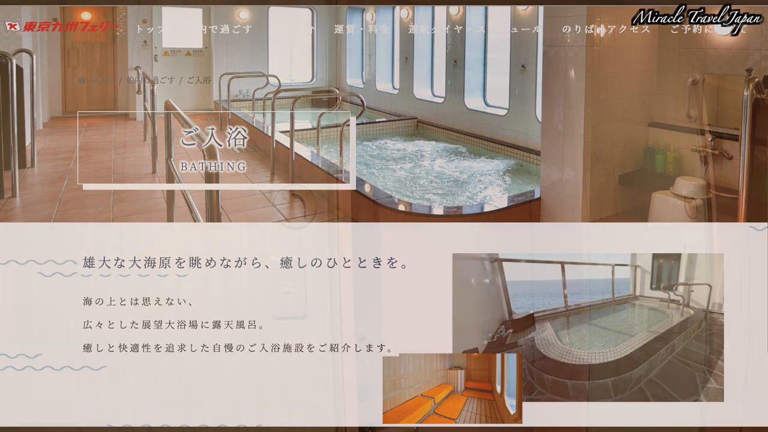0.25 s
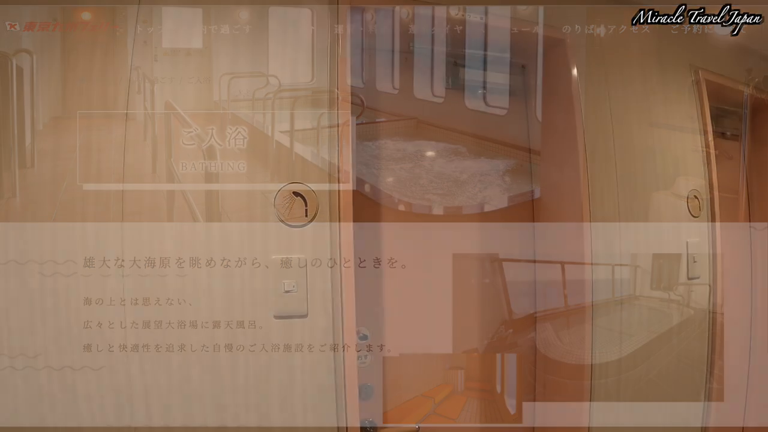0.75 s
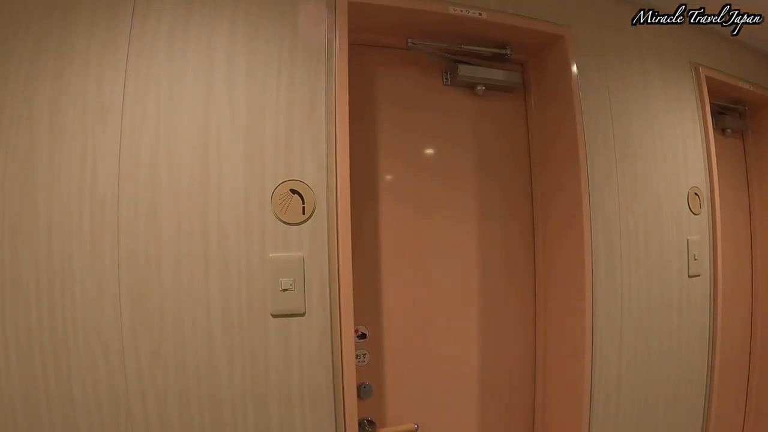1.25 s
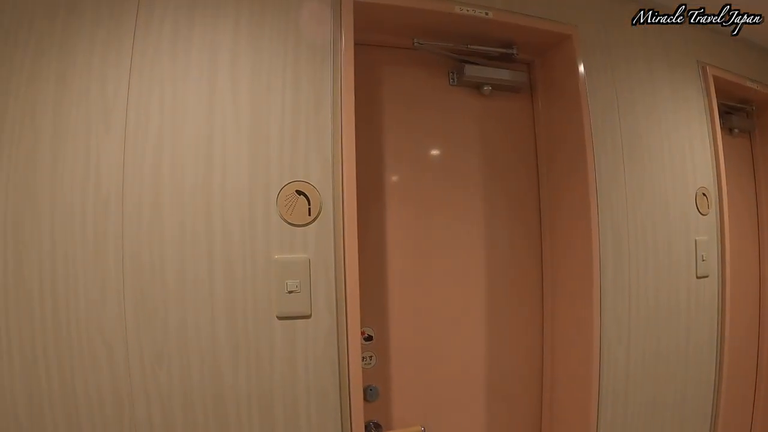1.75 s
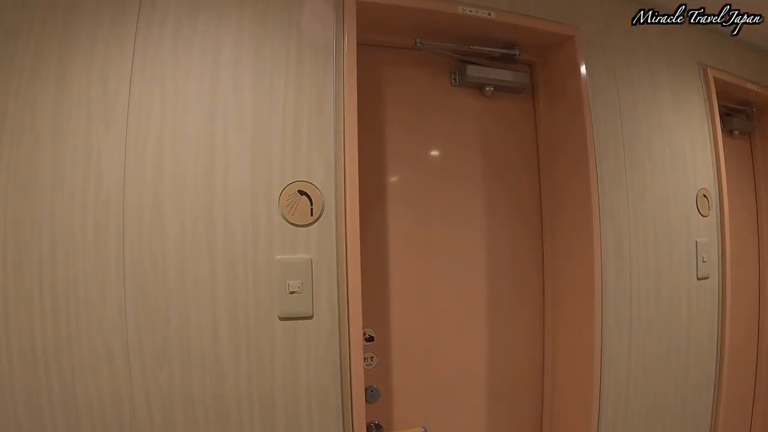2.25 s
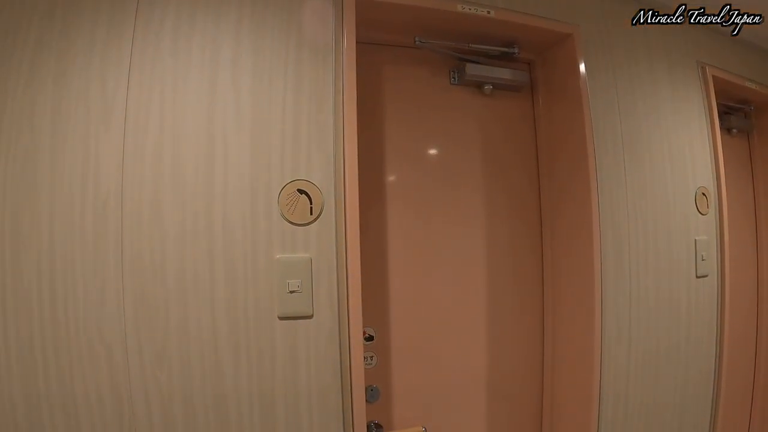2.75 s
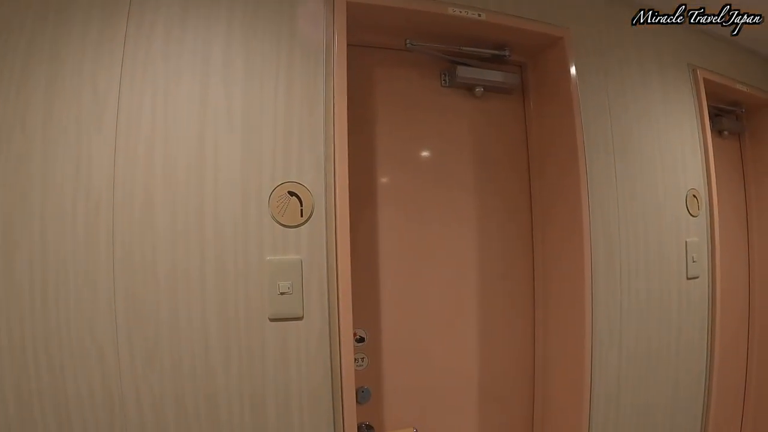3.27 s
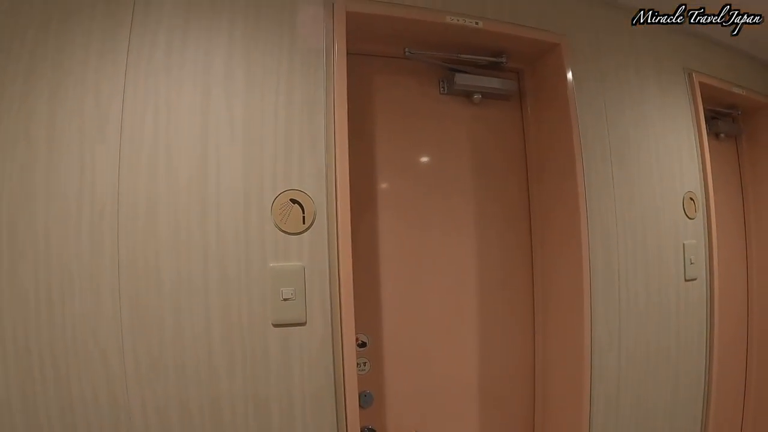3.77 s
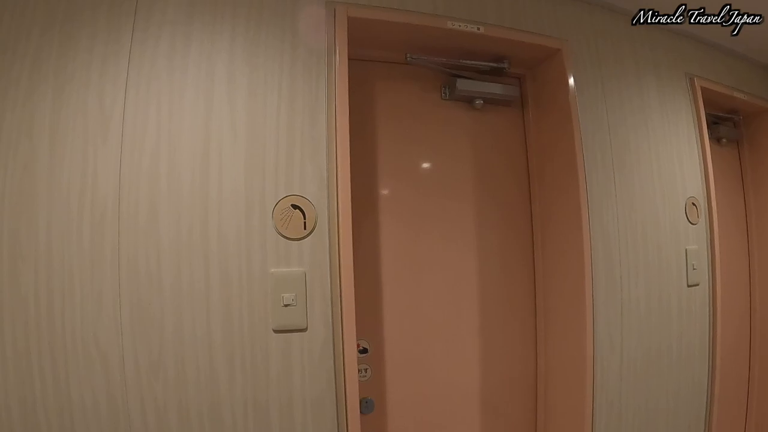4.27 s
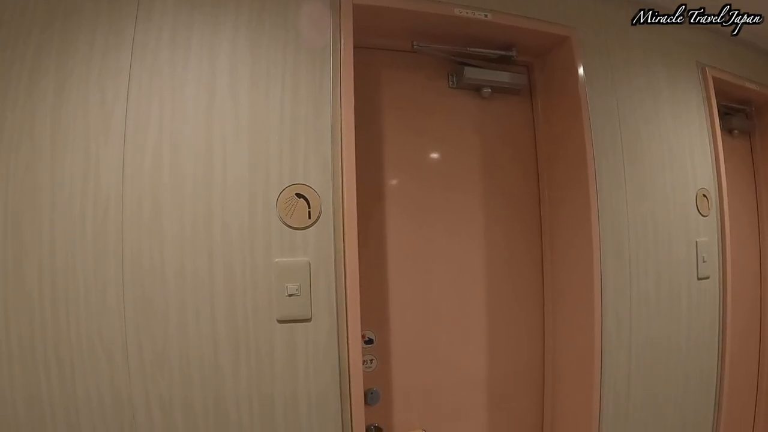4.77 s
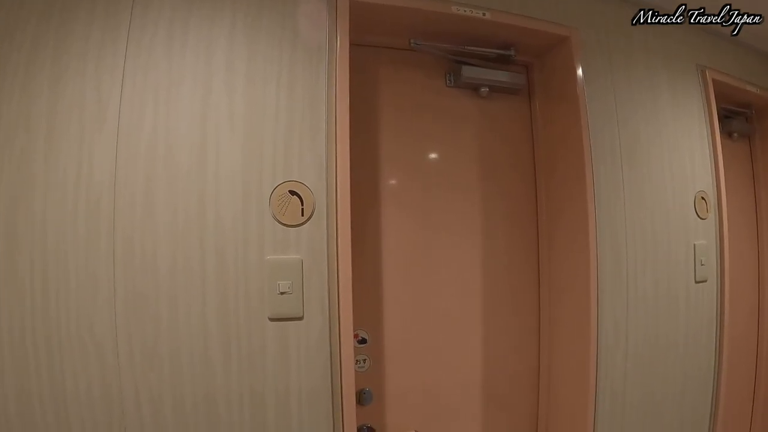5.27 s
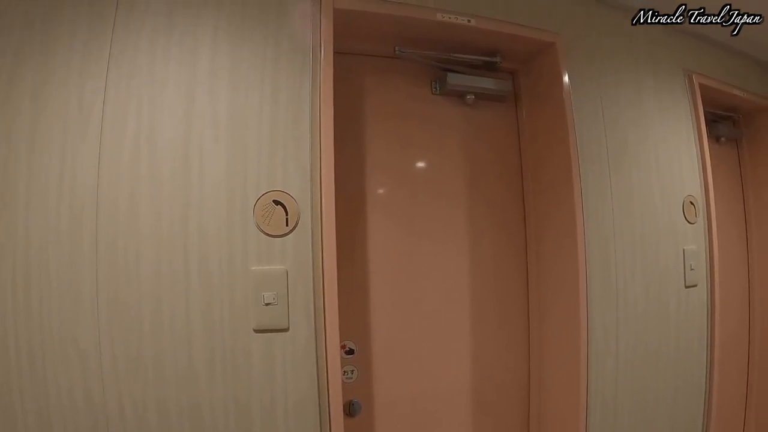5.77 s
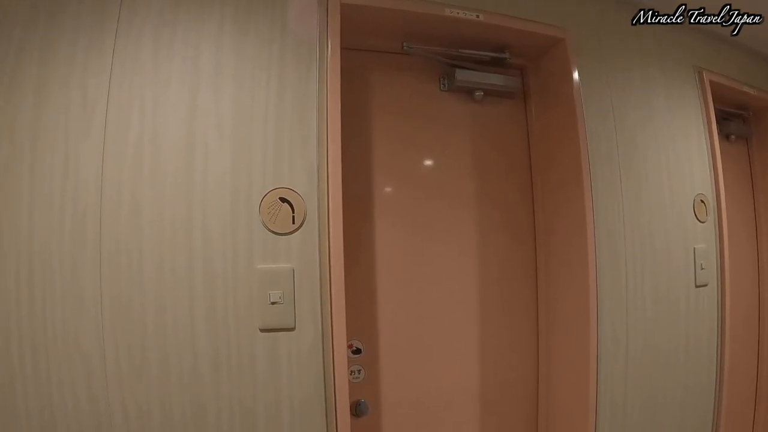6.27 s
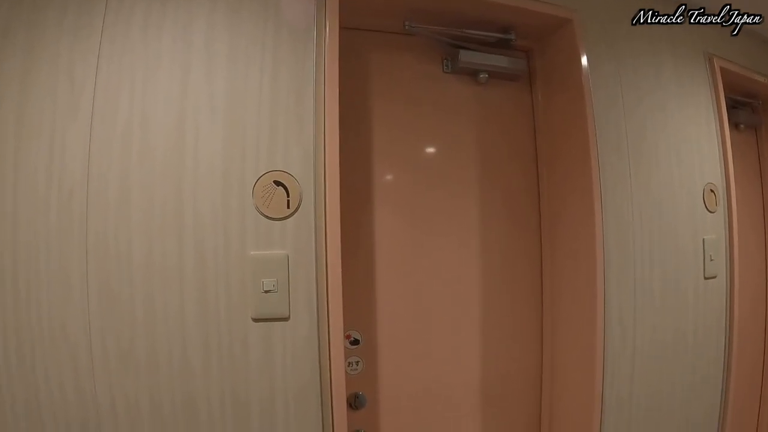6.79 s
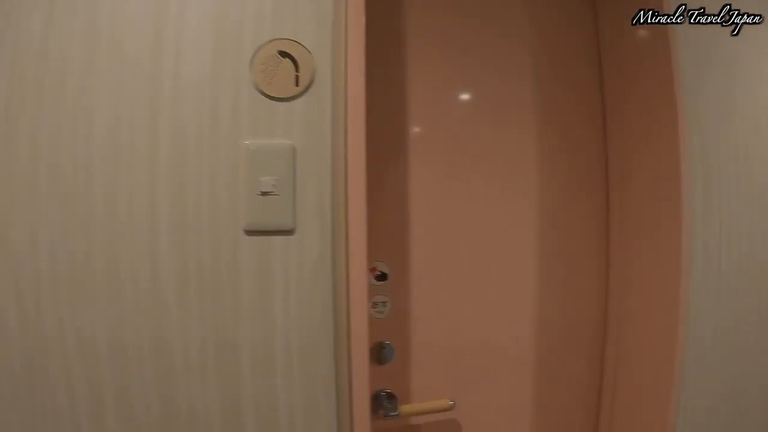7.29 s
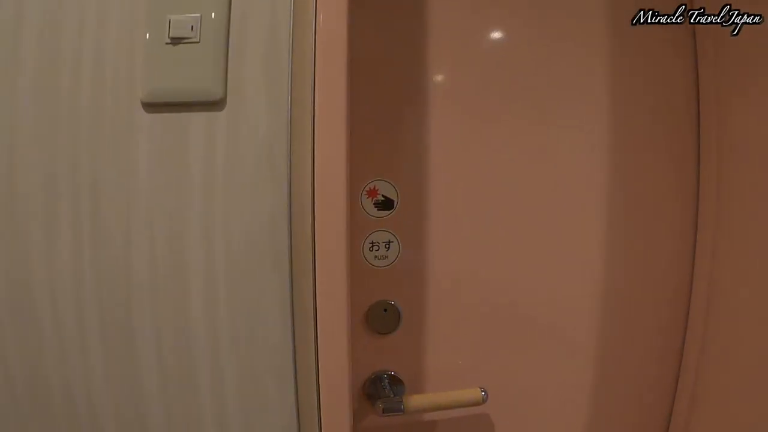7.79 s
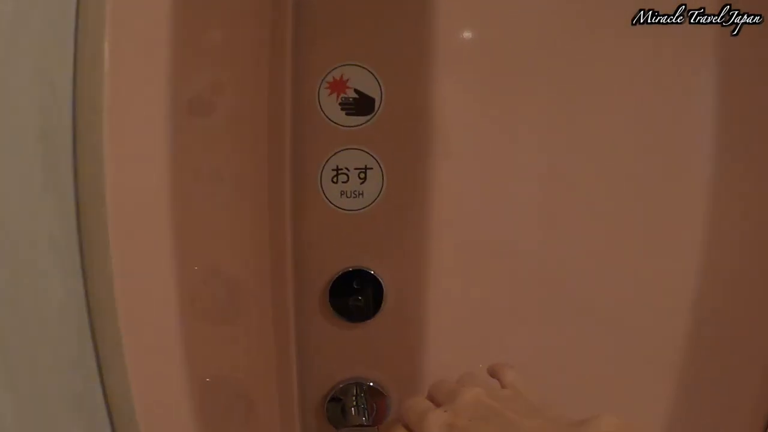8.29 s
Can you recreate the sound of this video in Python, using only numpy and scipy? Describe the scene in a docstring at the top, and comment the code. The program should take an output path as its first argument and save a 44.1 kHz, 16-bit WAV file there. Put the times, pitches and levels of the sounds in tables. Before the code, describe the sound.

Handheld microphone in a shower room aboard a ship: beating, wavering engine rumble beneath a dull broad roar and steady fan tones, all fading in quickly. Reverberant clunks come from somewhere down the room in the first few seconds, then scattered light ticks. After a stretch of just rumble and hum, cloth rubs softly and a close door handle gives crisp clicks and small rattles. Treble is muffled.

```python
"""Shower room on a ship

Engines throb through the hull, made of close tones that beat and low booms of wandering pitch.
Machinery and ventilation roar and hum behind the walls: shaped noise and steady tones, which fade in.
A faint treble dies away at the start. Hard things are knocked further down the tiled room (ringing noise
with echo); close by, small parts click (short bursts of noise) and clothes rustle (grainy hiss).
"""
import sys
import numpy as np
from scipy import signal
from scipy.fft import rfft, irfft, next_fast_len
from scipy.io import wavfile
from scipy.ndimage import uniform_filter1d

SR = 44100
rng = np.random.default_rng(int(sys.argv[2]) if len(sys.argv) > 2 else 0)


def output_pcm(signal):
    """Save a mono or channel-first signal as 16-bit PCM at the path in sys.argv[1].

    Samples are clipped to [-1, 1] before scaling.
    """
    pcm = np.clip(np.atleast_2d(signal).T, -1, 1) * 32767
    wavfile.write(sys.argv[1], SR, np.round(pcm).astype(np.int16))


N = 376613


def undb(db):
    """Turn decibels into a gain."""
    return 10 ** (np.asarray(db) / 20)


def level(x, db):
    """Scale a sound to an average (rms) level."""
    return x * undb(db) / np.sqrt(np.mean(x ** 2))


def curve(table, column=1):
    """Join the points of a table column by straight lines in time."""
    rows = np.array(table)
    return np.interp(np.arange(N) / SR, rows[:, 0], rows[:, column])


def over(table, hz):
    """Join the points of a (pitch_hz, value) table on a logarithmic pitch axis."""
    rows = np.array(table)
    return np.interp(np.log(hz), np.log(rows[:, 0]), rows[:, 1])


def freqs(size):
    """Frequencies of a transform's bins, in Hz, kept off zero."""
    return np.maximum(np.fft.rfftfreq(size, 1 / SR), 1)


def rings(modes, hz):
    """Add up the power of resonances (pitch_hz, width_hz, level_db)."""
    return sum(undb(2 * db) / (1 + (2 * (hz - f) / width) ** 2) for f, width, db in modes)


# How wide the stereo noise is: (pitch_hz, side_minus_mid_db)
WIDTH = [(30, -23), (60, -29.5), (125, -23.5), (190, -18.5), (300, -16), (600, -6), (1000, -4), (2000, -3),
         (4000, -1.5), (8000, -1), (13000, 1.5)]
# How sound leans to one side: (pitch_hz, left_minus_right_db)
LEAN = [(30, .2), (125, .3), (250, .9), (500, 1.8), (1000, 2.3), (2000, 1.9), (4500, 1.1), (8000, 2.1),
        (13000, 0)]
# How far the right port leads the left: (pitch_hz, phase_radians)
LAG = [(125, .03), (250, .09), (500, 0.25), (1200, 0.27), (2800, 0.86), (6000, .05)]


def pair(size, gain):
    """Coloured noise on two ports: much alike in the bass, less so in the treble."""
    hz = freqs(size)
    mid, side = rfft(rng.standard_normal((2, size))) * gain
    side = side * undb(over(WIDTH, hz))
    # each port takes half of the lean and half of the lag
    lean = undb(over(LEAN, hz) / 2) * np.exp(-.5j * over(LAG, hz))
    return irfft(np.array([(mid + side) * lean, (mid - side) / lean]), size)


def walk(rate):
    """Slow random wander: values drawn `rate` times a second, smoothed twice."""
    hold = int(SR / rate)
    steps = np.repeat(rng.standard_normal(N // hold + 1), hold)
    return uniform_filter1d(uniform_filter1d(steps, hold), hold)[:N]


def swells(table):
    """Gain of bell-shaped swells (peak_s, level_db, length_s), added as power."""
    t = np.arange(N) / SR
    return np.sqrt(sum(undb(2 * db) * np.exp(-(2 * (t - s) / length) ** 2) for s, db, length in table))


def pan(x, db):
    """Put a sound on both ports, the left louder by db."""
    return x * undb(np.array([[db], [-db]]) / 2)


def add(out, x, s):
    """Mix x in at time s, in seconds."""
    i = int(s * SR)
    out[:, i:i + x.shape[1]] += x[:, :N - i]


# Machines that shake the hull: (turns_per_s, stroke_s,
# {multiple of the turning rate: push 1 or pull -1})
ENGINES = [(5.6205, .0286, {5: -1, 6: 1, 7: 1}), (6.007, .1217, {5: 1, 6: 1}), (27.533, .014, {1: 1})]
# How strongly the deck answers an engine tone: (pitch_hz, level_db)
SHAKE = [(27.5, -35), (28.1, -36), (30, -34), (33.7, -30.5), (36, -34), (39.3, -39)]
# Deepest hull booms: (middle_pitch_hz, wander_scale_hz, relative_level_db)
HULL = [(25.5, 2.2, -3), (34.8, 1.2, 0), (41, 1.6, -7)]
HULL_DB, HULL_WANDER_PER_S = -33, 2.5  # level before the throb's own rises and dips
# Rises and dips of the whole throb: (time_s, change_db)
THROB = [(0, 2.5), (.6, -0.5), (1, -1.5), (1.4, 3), (1.7, 4), (1.95, -13), (2.1, 0.5), (2.5, -1.5),
         (2.75, 4), (3.25, -3), (3.4, -13.5), (3.6, 2), (3.8, -0.5), (4.05, 9), (4.3, -18), (4.6, 2),
         (5, -1), (5.25, -1), (5.5, 7), (5.88, -3.5), (6.25, 5), (6.5, -0.5), (6.73, -8), (6.92, 5.5),
         (7.16, -9), (7.4, -2.5), (7.7, -7), (7.97, -2), (8.2, -12), (8.54, 4.5)]
THROB_LEAN_DB = .3  # left minus right


def throb():
    """Close engine tones beat against each other, and the hull booms at a wandering pitch."""
    t = np.arange(N) / SR
    beats = 0
    for rate, stroke, multiples in ENGINES:
        for multiple, push in multiples.items():
            tone_hz = multiple * rate
            amplitude = push * np.sqrt(2) * undb(over(SHAKE, tone_hz))
            beats = beats + amplitude * np.cos(2 * np.pi * tone_hz * (t - stroke))
    boom = 0
    for middle_hz, wander_hz, db in HULL:
        pitch_hz = middle_hz + wander_hz * walk(HULL_WANDER_PER_S)
        boom = boom + undb(db) * np.sin(2 * np.pi * np.cumsum(pitch_hz) / SR)
    return pan((beats + level(boom, HULL_DB)) * undb(curve(THROB)), THROB_LEAN_DB)


# Swells of the pump tone: (peak_s, level_db, length_s)
PUMP = [(1.7, -61, 0.2), (3.4, -62, 0.15), (4.58, -61, 0.081), (7.15, -52.5, 0.1), (7.8, -54, 0.34)]
PUMP_HZ, PUMP_IDLE_DB = 668, -64
TONE_LEAN_DB = 5  # left minus right


def pump():
    """A motor tone idles softly and swells now and then, its level and pitch wandering a little."""
    gain = (undb(PUMP_IDLE_DB) + swells(PUMP)) * undb(1.8 * walk(5.1))
    pitch_hz = PUMP_HZ + 1.81 * walk(4)
    return pan(np.sqrt(2) * gain * np.sin(2 * np.pi * np.cumsum(pitch_hz) / SR), TONE_LEAN_DB)


# Colour of the roar: (pitch_hz, relative_level_db_per_hz)
ROAR = [(6, -21.5), (14, -9), (22, -15), (33, -19.5), (44, -19.5), (52, -18.5), (110, -24), (160, -32.5),
        (215, -36.5), (400, -39.5), (800, -42.5), (1230, -45), (2500, -58), (8000, -73.5), (11000, -80),
        (15000, -97.5)]
# Walls and deck plates that the roar rings: (pitch_hz, width_hz, db_over_the_roar)
PLATES = [(64.2, 9.4, 8.5), (90.4, 12.3, 7.5), (138, 13, 5), (141.7, 6.8, 8.5), (181, 11.7, 9),
          (191.4, 7.4, 11), (238.3, 8.6, 7.5), (269.4, 21.6, 10.5), (287.6, 12, 9.5), (336, 14, 5.5),
          (359, 23.2, 8.5), (511.5, 3.3, 3.5), (758, 9.6, 2.5)]
# Level changes of three bands of the roar: (time_s, bass_db, low_middle_db, treble_db)
PLACE = [(0, 1.5, 3.5, -2), (1.2, 1, 6, -3.5), (2, 2, 1, -3), (2.8, -1.5, 3.5, -4), (4, 2, 2, -1.5),
         (5.2, 4, 1, -0.5), (6, 0, 1, -1.5), (7.2, 2.6, -0.3, 0.8), (8.54, 3, 2, -2)]
ROAR_DB = -30  # before those changes
DEEP_HZ, LOW_MIDDLE_HZ, TREBLE_HZ = 133, 450., 5500.  # edges between the bands


def roar():
    """Broad noise rings the walls and plates; its bass, low middle and treble rise and fall apart."""
    size = next_fast_len(N)
    hz = freqs(size)
    noise = level(pair(size, undb(over(ROAR, hz)) * np.sqrt(1 + rings(PLATES, hz))), ROAR_DB)
    spectrum = rfft(noise)
    # everything below each edge; differences between these are the bands
    deep, low, body = (irfft(spectrum / (1 + (hz / edge) ** 4), size)[:, :N]
                       for edge in (DEEP_HZ, LOW_MIDDLE_HZ, TREBLE_HZ))
    bass = deep * undb(curve(PLACE))
    low_middle = (low - deep) * undb(curve(PLACE, column=2))
    treble = (noise[:, :N] - body) * undb(curve(PLACE, column=3))
    return bass + low_middle + (body - low) + treble


# Steady tones of fans and motors: pitch_hz
HUM_HZ = [92.6, 135.4, 148.6, 232.1, 288.6, 302.9, 355, 361, 638.6, 671.4, 725.4, 729.5]
# One row for each of those tones: (level_halfway_db, drift_db_per_s)
HUM = [(-46, 0), (-53, 0), (-50, 0), (-60, 0), (-56, 0), (-61, 0), (-53, 0), (-57, 0), (-65, 0.2), (-67, 0),
       (-72, -.3), (-60, -.8)]
# Another motor, its first four multiples: level_db
MOTOR_DB = [-46.5, -55.5, -59.5, -56]
MOTOR_HZ = 64.27
WAVER_DB, WAVER_RAD = 1.5, .6  # scale of the random wander in level and phase


def hum():
    """Fan and motor tones, each wavering a little in level and phase."""
    t = np.arange(N) / SR
    tones = [(f, db + drift * (t - N / 2 / SR)) for f, (db, drift) in zip(HUM_HZ, HUM)]
    tones += [((k + 1) * MOTOR_HZ, db) for k, db in enumerate(MOTOR_DB)]
    out = 0
    for f, db in tones:
        gain = np.sqrt(2) * undb(db + WAVER_DB * walk(3.))
        tone = gain * np.sin(2 * np.pi * f * t + WAVER_RAD * walk(1.46))
        out = out + pan(tone, over(LEAN, f))
    return out


FADE_START_S, FADE_S, FADE_FLOOR_DB = 0.093, 0.63, -23.5
RISE_DB_PER_S = 0.27


def fade():
    """A straight fade-in from a soft floor, with a slow rise in level to the end."""
    t = np.arange(N) / SR
    fade_in = np.clip((t - FADE_START_S) / FADE_S, undb(FADE_FLOOR_DB), 1)
    return fade_in * undb(RISE_DB_PER_S * (t - t[-1]))


# Ringing bands of the faint first treble: (pitch_hz, width_hz, relative_level_db)
FIRST_HISS = [(2150, 180, 1), (2840, 200, 0), (3970, 250, 4), (5700, 270, -3), (7400, 540, 2),
              (9250, 600, 1), (12700, 2200, 4)]
FIRST_HISS_DB, FIRST_HISS_T60_S = -53, 0.43  # level before the decay; time to fall by 60 dB


def first_hiss():
    """A faint ringing treble, noise shaped by resonances, dies away from the start."""
    size, out = 2 ** 14, np.zeros((2, N))
    colour = np.sqrt(undb(-30) + rings(FIRST_HISS, freqs(size)))
    hiss = level(pair(size, colour), FIRST_HISS_DB)
    add(out, hiss * undb(-60 * np.arange(size) / SR / FIRST_HISS_T60_S), 0)
    return out


# How long the tiled room echoes: (pitch_hz, time_to_fall_60_db_s)
TILES = [(500, 1.2), (1500, 0.77), (4000, 0.72), (9000, 0.64), (15000, 0.13)]
TILES_HOLD_S = 0.052  # the decay starts gently over about this time


def tiles(size):
    """Echo of the room: dense at once, held while sound comes round the corner, then dying by band."""
    hz, s, out = freqs(size), np.arange(size) / SR, 0
    late = np.sqrt(s ** 2 + TILES_HOLD_S ** 2) - TILES_HOLD_S
    for centre in 350 * 2 ** np.arange(6):  # bands an octave apart
        band = np.cos(np.pi / 2 * np.clip(np.log2(hz / centre), -1, 1))
        out = out + pair(size, band) * undb(-60 * late / over(TILES, centre))
    return out


# The blows: (start_s, level_db, centre_hz, breadth_octaves, own_ring_hz, ring_db)
KNOCKS = [(0.817, -47, 2740, 1.75, 1630, 10.5), (0.828, -54.5, 2780, 0.92, 2860, 12),
          (1.078, -60.5, 3900, 0.67, 2960, 11), (1.38, -66, 5000, 0.91, 5000, -1),
          (1.934, -54, 2980, 1.1, 3000, 1), (1.94, -63.5, 9500, .5, 9500, 2),
          (1.97, -64, 4300, 0.57, 4300, 6), (2.04, -62, 4100, 0.58, 4100, 10),
          (2.422, -41, 1860, 1.5, 1410, 13.5), (2.45, -47, 2370, .3, 2380, 8),
          (2.501, -45, 1750, 0.27, 1730, 6), (2.685, -32.5, 2960, 1.2, 1840, 13),
          (2.696, -40.5, 2350, 1.5, 1500, 14), (2.74, -40, 2200, 1.4, 1800, -1),
          (2.765, -44.5, 1650, 0.47, 1560, 10), (2.70, -43, 556, 1.24, 550, 13.5),
          (3.649, -55.5, 5200, 0.76, 4900, 7), (3.66, -72, 6700, .4, 6800, 4),
          (3.688, -55, 4000, 3.2, 2800, 3), (4.328, -59, 4600, 1.3, 4960, 11)]
# What every blow rings: (pitch_hz, width_hz, level_db)
FITTING = [(1243, 58, 13.5), (1540, 45, 15), (1730, 36, 13), (1830, 40, 7.5), (1924, 25, 13), (2350, 40, 7),
           (2520, 150, 8), (2960, 680, 3), (4130, 130, 3), (4430, 67, 4), (5140, 380, -4)]
RING_WIDTH = .13  # width of each blow's own ring, as a share of that ring's pitch
KNOCK_RISE_S = 0.0019
SLAP_DB, SLAP_S, SLAP_HZ = -5, 0.0073, 3500  # extra bright sound at the start: level, decay, low edge
ECHO_FLUTTER_DB = 1.5  # scale of the uneven waves in the echo


def knocks():
    """Each blow has its own hardness and ring, heard as a short bright slap and much room echo."""
    size, out = 2 ** 16, np.zeros((2, N))
    half = size // 2
    hz, age = freqs(size), np.arange(half) / SR
    rise = 1 - np.exp(-age / KNOCK_RISE_S)
    slap = undb(SLAP_DB) * np.exp(-age / SLAP_S)
    high_pass = 1 / (1 + (SLAP_HZ / hz) ** 4)
    for s, db, centre_hz, octaves, ring_hz, ring_db in KNOCKS:
        modes = FITTING + [(ring_hz, RING_WIDTH * ring_hz, ring_db)]
        hardness = 1 / (1 + (np.log2(hz / centre_hz) / octaves) ** 4)
        room = rfft(tiles(size)) * np.sqrt(0.5 + rings(modes, hz)) * hardness
        echo = irfft(room, size)[:, :half]
        bright = irfft(room * high_pass, size)[:, :half]
        flutter = undb(ECHO_FLUTTER_DB * walk(40)[:half])
        knock = (echo + slap * bright) * rise * flutter
        # the level is that of the first 93 ms
        early_rms = np.sqrt(np.mean(knock[:, :size // 16] ** 2))
        add(out, knock * undb(db) / early_rms, s)
    return out


# The ticks: (start_s, level_before_decay_db, centre_hz, breadth_octaves, time_to_fall_60_db_s)
CLICKS = [(3.888, -51, 4180, .9, 0.016), (3.961, -47, 6300, 0.49, 0.018), (3.962, -47, 3380, 0.27, 0.024),
          (4.125, -62, 7700, .3, .02), (4.286, -51, 2700, .4, .03), (4.333, -51, 2800, 0.5, 0.05),
          (7.18, -56, 3000, .8, .027), (7.29, -44, 2600, 0.48, 0.05), (7.298, -52, 3800, 0.92, .09),
          (7.33, -57, 5000, .6, .04), (7.545, -53, 2500, 0.55, .03), (7.788, -47, 5000, 0.36, 0.013),
          (7.87, -58, 7500, .4, 0.018), (7.906, -56, 6500, 0.53, .022), (7.975, -58, 7960, 0.71, .019),
          (8.001, -32.5, 6500, 1.5, 0.0096), (8.022, -48, 3000, 1, .015), (8.058, -50, 2400, .7, .03),
          (8.075, -44, 2600, 0.9, 0.018), (8.099, -40, 3000, 0.94, 0.019), (8.12, -54, 3000, 0.93, 0.027),
          (8.158, -42, 2480, 0.48, 0.034), (8.161, -51, 5600, .2, .025), (8.188, -54, 3000, .6, .014),
          (8.252, -45, 2000, 0.62, 0.042), (8.252, -52, 7500, .4, .015), (8.273, -56, 7960, .3, .015),
          (8.346, -53, 4500, 1.1, .035), (8.473, -46, 2300, 0.44, .02), (8.474, -54.5, 9700, .15, .015),
          (8.506, -40.5, 6000, 1.2, 0.012)]


def clicks():
    """Dry ticks close by: short, quickly dying noise round one pitch."""
    size, out = 4096, np.zeros((2, N))
    hz, age = freqs(size), np.arange(size) / SR
    rise = 1 - np.exp(-age / 0.00028)
    for s, db, centre_hz, octaves, t60 in CLICKS:
        tick = pair(size, 1 / (1 + (np.log2(hz / centre_hz) / octaves) ** 6))
        add(out, level(tick, db) * rise * undb(-60 * age / t60), s)
    return out


# Rubs of cloth: (peak_s, level_db, length_s, extra_treble_db)
RUSTLE = [(6.82, -59.5, 0.066, 4), (6.952, -59, 0.07, 7), (7.02, -59, 0.2, 5), (7.183, -55, 0.08, 3),
          (7.3, -56.5, 0.11, 4), (7.4, -58, 0.21, 2), (7.55, -65, .06, 1), (7.79, -61, 0.055, -3),
          (7.885, -59, 0.16, -2), (8.008, -55, 0.065, 3), (8.09, -52.5, 0.12, 1), (8.17, -57, 0.064, -1),
          (8.3, -57.5, 0.15, -6), (8.452, -61.5, 0.2, 11)]
# Colour of the cloth hiss: (pitch_hz, relative_level_db_per_hz)
CLOTH = [(1200, 4), (2500, 12), (3500, 5), (5000, 3.5), (6300, 0.5), (7200, 1), (8100, -1), (9000, -4.5),
         (12500, -6.5), (15000, -6.5)]
CLOTH_TREBLE_HZ = 9000  # the extra treble lies above this


def rustle():
    """Cloth rubbing: hiss broken into uneven grains, with now and then a sharper snag."""
    size = next_fast_len(N)
    hz = freqs(size)
    snags = np.clip(walk(300) - 1.3, 0, None)
    grains = undb(2.0 * walk(30) + 2.0 * walk(200) + 7 * snags)
    cloth = level(pair(size, undb(over(CLOTH, hz)))[:, :N] * grains, 0)
    dull = irfft(rfft(cloth, size) / (1 + (hz / CLOTH_TREBLE_HZ) ** 8), size)[:, :N]
    dull_rubs = swells([(s, db, length) for s, db, length, treble in RUSTLE])
    treble_rubs = swells([(s, db + treble, length) for s, db, length, treble in RUSTLE])
    return dull * dull_rubs + (cloth - dull) * treble_rubs


def scene():
    """All the sounds together; only the engines, pump, roar and hum fade in."""
    ship = (throb() + pump() + roar() + hum()) * fade()
    return ship + first_hiss() + knocks() + clicks() + rustle()


# Width of the stereo picture: (time_s, side_change_db)
SPREAD = [(0, 3.5), (.2, -10), (.27, -49), (.9, -43), (1.3, -27.5), (2.8, -8.5), (4.5, -4.5), (8.54, -2.5)]
# Tone of the microphone: (pitch_hz, level_db)
MIC = [(7500, 0.5), (8500, -4.5), (10500, -8.5), (15000, -20)]
TOP_HZ = 15000


def record(dry):
    """Stereo closes nearly to mono, then slowly opens; the microphone dulls the treble, a filter cuts the top."""
    size = next_fast_len(N)
    mid = (dry[0] + dry[1]) / 2
    side = (dry[0] - dry[1]) / 2 * undb(curve(SPREAD))
    ports = rfft([mid + side, mid - side], size)
    dull = irfft(ports * undb(over(MIC, freqs(size))), size)[:, :N]
    return signal.sosfilt(signal.ellip(8, .2, 70, TOP_HZ, fs=SR, output="sos"), dull)


dry = scene()
out = record(dry)
output_pcm(out)
```